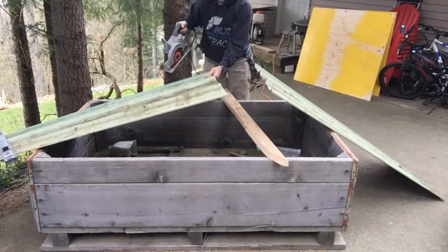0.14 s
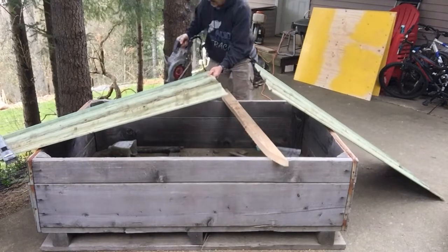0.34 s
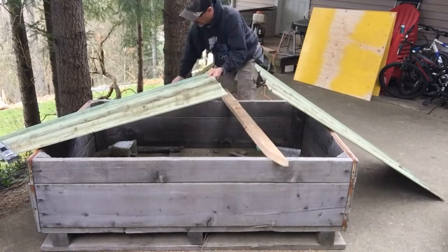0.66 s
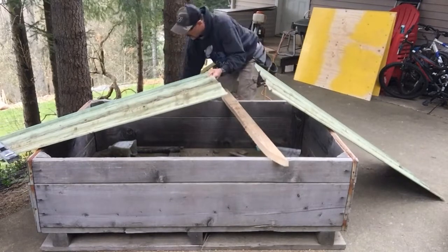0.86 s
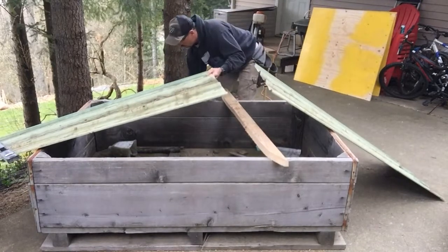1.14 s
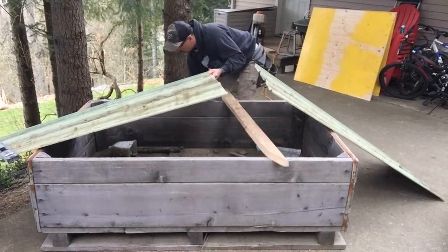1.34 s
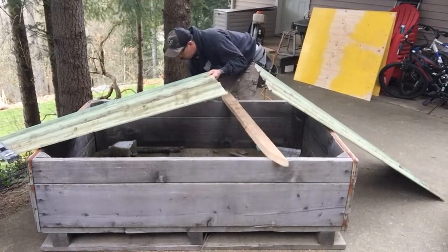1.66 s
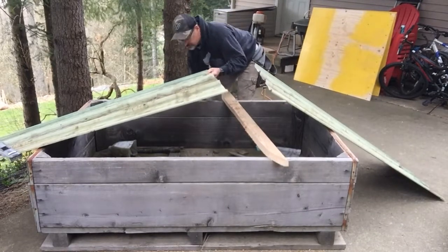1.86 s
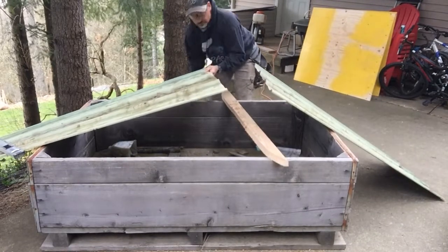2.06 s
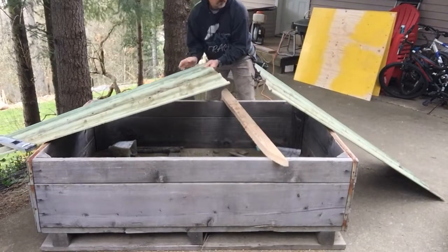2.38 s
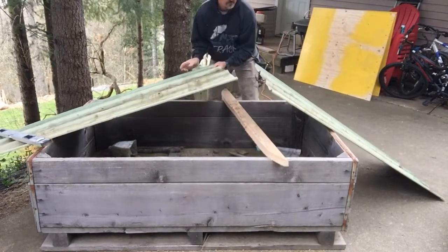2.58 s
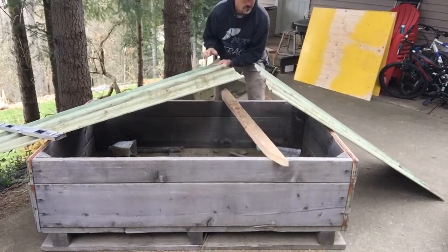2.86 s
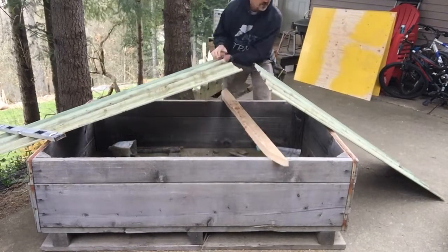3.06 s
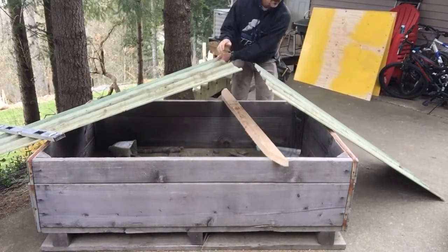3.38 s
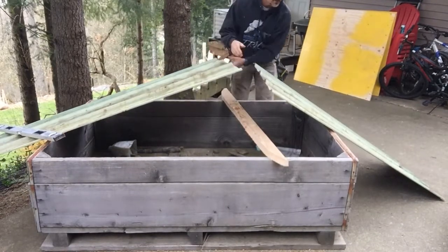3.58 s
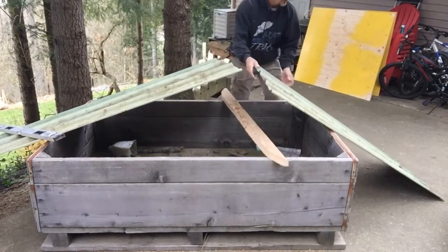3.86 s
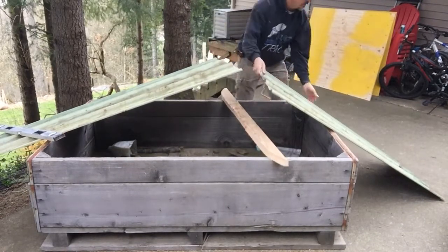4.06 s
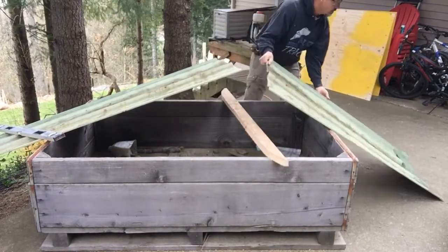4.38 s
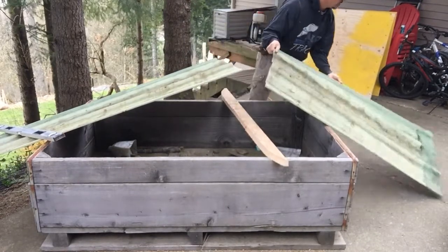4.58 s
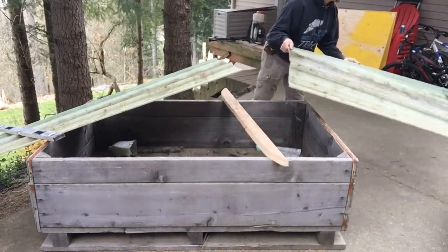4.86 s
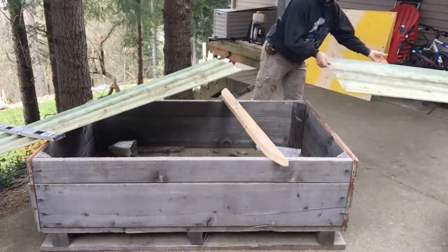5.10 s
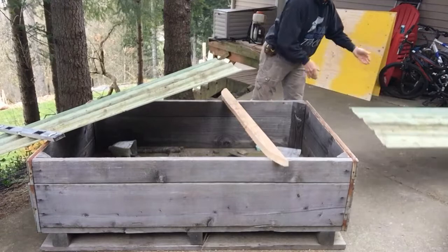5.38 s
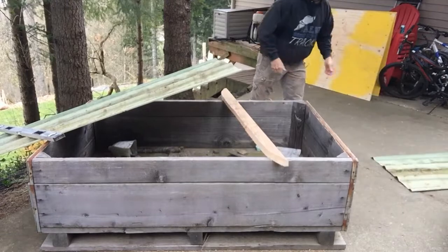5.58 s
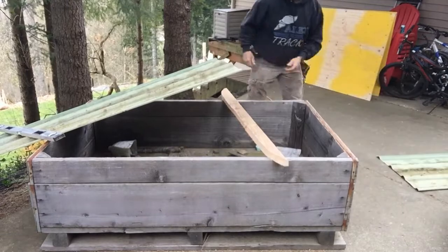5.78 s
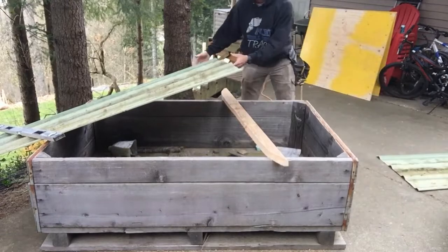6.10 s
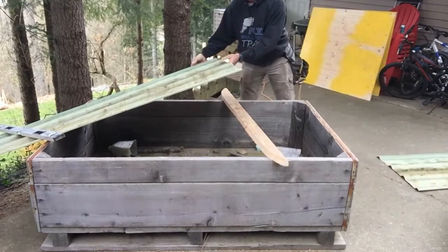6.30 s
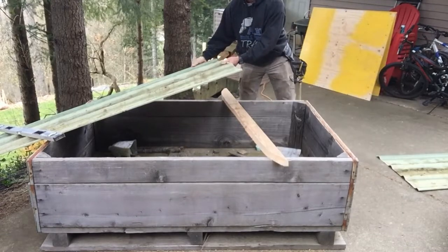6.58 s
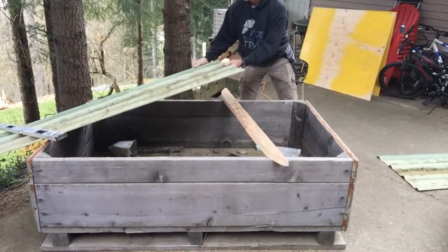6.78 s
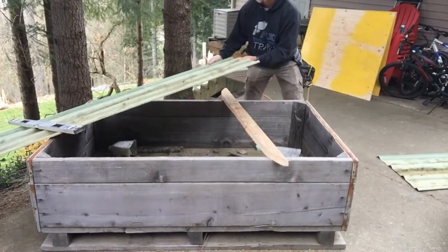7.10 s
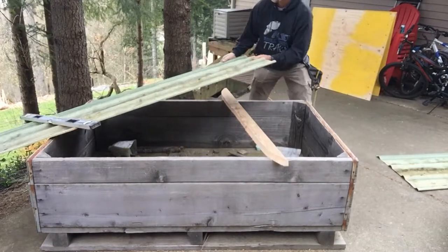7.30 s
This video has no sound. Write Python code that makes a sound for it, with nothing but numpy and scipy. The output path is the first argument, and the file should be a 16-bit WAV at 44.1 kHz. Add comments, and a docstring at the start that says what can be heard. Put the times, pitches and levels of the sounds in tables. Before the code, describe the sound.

A corrugated metal sheet shudders at the very start and rings out over about a second. From 1.2 to 2.1 seconds a stopped saw is set down with several rattling knocks and dull, hollow thumps. Between 2.2 and 3.3 seconds the sheet is dragged over a timber crate, scraping and catching with short dry cracks. Lighter scrapes and clicks come from 4.2 to 4.7 seconds as an offcut is lifted. At about 5.6 seconds it lands on concrete with a bright, clattering crash, by far the loudest sound, briefly overloading the microphone and ringing away within a second. From 6.8 seconds to the end the sheet slides again with a softer scrape. The setting is outdoors, with a slight echo. A low breeze rumbles on the microphone throughout, and small birds give thin, high whistles and faint chirps, clearest around 2 and 4 seconds.

```python
"""Handling a corrugated metal sheet

The sheet rings out after a cut, and the stopped saw is set down with a few rattling knocks. Dragged over a
timber crate, the sheet's edge slips and catches, exciting its bending modes. The offcut is lifted and tossed
onto concrete with a crash so loud its peaks are flattened; then the sheet is slid forward again. Small birds
whistle in the trees and a breeze rumbles."""
import sys
import numpy as np
from scipy import signal
from scipy.io import wavfile
from scipy.ndimage import uniform_filter1d

SR = 44100
rng = np.random.default_rng(int(sys.argv[2]) if len(sys.argv) > 2 else 0)


def wav_record(signal):
    """Record a signal, one row per channel, as 16-bit PCM in the file named by sys.argv[1]."""
    frames = np.transpose(np.atleast_2d(signal))
    bounded = np.clip(frames, -1, 1)
    # unit amplitude maps onto the largest positive 16-bit level
    quanta = np.round(bounded * 32767).astype(np.int16)
    wavfile.write(sys.argv[1], SR, quanta)


N = 328545


def amp(db):
    """Decibels to gain."""
    return 10 ** (np.asarray(db) / 20)


def unit_rms(x):
    """Scales to rms 1."""
    return x / np.sqrt(np.mean(x ** 2) + 1e-20)


def curve_at(points, hz):
    """Interpolates (Hz, value) rows on a log-frequency axis."""
    points_hz, values = np.transpose(points)
    return np.interp(np.log(hz + 1), np.log(points_hz + 1), values)


def add(mix, start_s, sound):
    """Mixes a sound in at start_s."""
    part = mix[max(round(start_s * SR), 0):][:len(sound)]
    part += sound[:len(part)]


def colour(x, db_at, size=4096):
    """Minimum-phase filter of unit energy, shaped by db_at(Hz)."""
    db = db_at(abs(np.fft.fftfreq(size, 1 / SR)))
    log_gain = np.log(amp(np.maximum(db - db.max(), -90)))
    taps = np.fft.ifft(np.exp(np.conj(signal.hilbert(log_gain)))).real
    return signal.oaconvolve(x, taps / np.linalg.norm(taps))[:len(x)]


def hump_db(hz, centre_hz, db_per_octave):
    """Broad spectral hump: the harder a contact, the higher its centre."""
    return -db_per_octave * np.hypot(np.log2((hz + 20) / centre_hz), .5)


def impacts(samples, per_s, spread_db):
    """Tiny random impacts of uneven size, rms 1."""
    size = amp(spread_db * np.minimum(rng.exponential(1, samples), 4))
    sign = rng.choice([-1, 1], samples)
    struck = rng.random(samples) < per_s / SR
    return unit_rms(size * sign * struck + 1e-9)


def yard_echo(x, t60_s):
    """Scattered reflections from house wall, ground and trunks."""
    t = np.arange(SR) / SR
    taps = impacts(SR, 2500, 1.5) * amp(-60 * t / t60_s) * (t > .006)
    return signal.oaconvolve(x, taps / np.linalg.norm(taps))[:N]


def scrape(pushes, spectrum, slips_per_s, spread_db, judder_db):
    """Each push rises, holds and lets go; the edge slips in clumps, and a sharper bite adds treble."""
    t = np.arange(N) / SR
    body, treble = np.zeros((2, N))
    for start_s, rise_s, hold_s, release_s, force_db, bite_db in pushes:
        rise = np.clip((t - start_s) / rise_s, 0, 1)
        release = np.clip((t - start_s - rise_s - hold_s) / release_s, 0, 2)
        effort = rise * amp(force_db - 60 * release)
        body = np.hypot(body, effort)
        treble = np.hypot(treble, amp(bite_db) * effort)
    judder = unit_rms(uniform_filter1d(rng.standard_normal(N), size=350))
    force = impacts(N, slips_per_s, spread_db) * amp(judder_db * judder)
    dull = signal.sosfiltfilt(signal.butter(1, 2200, fs=SR, output="sos"), force)
    return colour(body * dull + treble * (force - dull), lambda hz: curve_at(spectrum, hz))


# Strongest bending modes. Each row: frequency in Hz, level in dB.
SHEET_MODES = [(371.4, -41), (646.0, -47), (759.0, -49.5), (834.4, -45), (904.4, -41.5), (1007, -51.5),
               (1114, -57.5), (1281, -43.5), (1497, -48), (1620, -49.5), (1723, -47), (1949, -55.5),
               (2003, -41.5), (2046, -50.5)]
# Bands the ribs let ring longer. Each row: centre in Hz, half-width in Hz.
RIB_RINGS = [(700, 65), (1950, 130), (3200, 200), (3900, 130)]
# Bands the ribs favour or choke. Each row: frequency in Hz, gain in dB.
RIB_GAINS = [(250, -2), (400, 0.5), (490, -2), (600, 1), (2060, 3), (2230, 0.5), (2950, 1), (3300, 3.5),
             (3700, 1), (4000, 0.5), (4400, 1), (6300, -1), (8000, -2.5)]


def sheet(force, t60s_s, contact_db, modes_db, rib_stretch=0.044, wander_hz=3.7):
    """Contact noise plus a dense cloud of bending modes; t60s_s runs from bass to treble."""
    t = np.arange(2 * SR) / SR
    modes = unit_rms(sum(amp(db) * np.sin(2 * np.pi * (hz * t + rng.random()))
                         for hz, db in SHEET_MODES))
    t60_curve = list(zip((400, 1200, 3300, 9000), t60s_s))
    out = amp(contact_db) * force
    for mode_set in range(3):
        cloud = rng.standard_normal(len(t)) + amp(modes_db) * modes
        bin_hz, frame_s, frames = signal.stft(cloud, SR, nperseg=256)
        ribs = sum(np.exp(-((bin_hz - hz) / half_hz) ** 2) for hz, half_hz in RIB_RINGS)
        t60_s = (curve_at(t60_curve, bin_hz) * (1 + rib_stretch * ribs))[:, None]
        ring = signal.istft(frames * amp(-60 * frame_s / t60_s) / np.sqrt(t60_s), SR, nperseg=256)[1]
        ring = colour(ring, lambda hz: curve_at(RIB_GAINS, hz))
        # The contact point wanders, so the force reaches changing sets of modes.
        share = np.cos(2 * np.pi * (wander_hz * np.arange(N) / SR + mode_set / 3)) * np.sqrt(2 / 3)
        out = out + signal.oaconvolve(share * force, ring / np.linalg.norm(ring))[:N]
    return out / np.hypot(1, amp(contact_db))


# Pushes of the edge over timber. Each row: start, rise, hold and release t60 in seconds,
# force in dB, treble bite in dB.
SHAKE_PUSHES = [(0, 0.00067, 0.0087, 0.14, -12.5, -1.5), (.01, .01, 0.09, 0.13, -20.5, -18),
                (.203, 0.0065, 0.01, 0.48, -32, 4.5)]
DRAG_PUSHES = [(2.17, 0.13, 0.1, .2, -44, -2), (2.33, 0.041, 0.15, 0.28, -45, 13),
               (2.4, .19, 0.076, 0.39, -30.5, 1.5), (2.72, 0.047, .015, 0.15, -25.5, -3),
               (2.84, .02, 0.011, 0.25, -27.5, -0.5), (2.95, 0.017, 0.087, .2, -30, 5.5),
               (3.05, 0.03, .04, 0.22, -35.5, 17.5), (3.11, .03, .02, 0.35, -33.5, -14)]
LIFT_PUSHES = [(4.225, 0.0077, .11, .25, -44, 4.5), (4.425, 0.0038, 0.12, .2, -40, 5),
               (4.52, 0.066, .025, .2, -28, -1), (4.95, 0.04, 0.16, .2, -57, 2),
               (5.162, .009, .03, .35, -41.5, -12.5), (5.28, 0.036, 0.19, .1, -54, -25)]
SLIDE_PUSHES = [(6.77, 0.085, .3, .3, -40.5, -2), (7.16, .15, .15, .2, -39.5, 7),
                (7.4, 0.038, .02, .2, -31, -5.5)]
# What the sheet radiates in each position. Each row: frequency in Hz, relative density in dB.
SHAKE_SPECTRUM = [(53, 2), (90, -0.5), (130, -7.5), (365, -2), (406, -8.5), (727, -5), (982, -10.5),
                  (1360, -9), (1580, -12), (1910, -12), (2950, -19), (14500, -29), (15500, -33)]
DRAG_SPECTRUM = [(82, -52), (140, -3), (238, -5), (333, 2), (367, -9), (405, -0.5), (513, -12.5),
                 (776, -12.5), (1370, -17.5), (1960, -20), (3330, -29.5), (6380, -28.5), (7610, -36),
                 (13700, -37), (15500, -44)]
LIFT_SPECTRUM = [(120, -52), (200, -16.5), (288, -11.5), (358, 0.5), (407, -7.5), (607, -5), (1110, -10.5),
                 (2020, -9.5), (2700, -17), (3230, -15), (4410, -19.5), (12700, -20), (15500, -19)]
SLIDE_SPECTRUM = [(88, -32.5), (150, -12), (307, 2), (499, -7.5), (540, -6), (708, -7.5), (1290, -8),
                  (1420, -11.5), (1730, -10), (3340, -18), (5980, -15), (9900, -22), (15500, -16.5)]


def sheet_handling():
    """The sheet shakes, is dragged, lifted and slid; hands and timber damp its treble."""
    shake = scrape(SHAKE_PUSHES, SHAKE_SPECTRUM, slips_per_s=6000, spread_db=2.1, judder_db=2.5)
    out = sheet(shake, t60s_s=(1.73, 1.26, 1.11, 1.0), contact_db=-2, modes_db=-18)
    drag = scrape(DRAG_PUSHES, DRAG_SPECTRUM, slips_per_s=2000, spread_db=1.73, judder_db=1.5)
    out += sheet(drag, t60s_s=(1.66, 0.72, 0.63, 0.082), contact_db=-0.5, modes_db=-24)
    lift = scrape(LIFT_PUSHES, LIFT_SPECTRUM, slips_per_s=5700, spread_db=2.9, judder_db=1.5)
    out += sheet(lift, t60s_s=(1.6, 0.78, 0.48, 0.085), contact_db=1, modes_db=-21.5, rib_stretch=.6)
    slide = scrape(SLIDE_PUSHES, SLIDE_SPECTRUM, slips_per_s=7000, spread_db=2.5, judder_db=1.15)
    return out + sheet(slide, t60s_s=(0.85, 1, 0.94, 0.31), contact_db=3, modes_db=-28)


# Turbulence at the microphone. Each row: frequency in Hz, relative density in dB.
BUFFET_SPECTRUM = [(20, -53), (35, -15), (55, 2), (95, -6), (150, -9), (260, -20.5), (500, -34),
                   (1200, -59.5)]


def buffet(pitch_ratio):
    """Turbulence of even strength; faster air shifts it upward."""
    noise = colour(rng.standard_normal(N), lambda hz: curve_at(BUFFET_SPECTRUM, hz / pitch_ratio))
    return noise / np.sqrt(uniform_filter1d(noise ** 2, size=2500) + 1e-6)


# Steady outdoor air. Each row: frequency in Hz, relative density in dB.
AIR_SPECTRUM = [(40, -15), (100, -4), (330, 2), (410, -7.5), (500, -17), (1300, -12.5), (2200, -17.5),
                (4000, -23), (6300, -26.5), (8500, -26.5), (15500, -31.5)]
# Gusts, and wafts from the flexing sheet. Each row: middle and half-length in seconds, level in dB.
GUSTS = [(.11, 0.17, -31), (1.014, 0.047, -40.5), (1.554, 0.061, -49), (1.856, 0.36, -39.5),
         (2.98, 0.3, -40.5), (3.896, 0.019, -42.5), (4.032, 0.029, -42.5), (4.347, .035, -40.5),
         (4.897, 0.024, -41), (5.642, .06, -28), (5.86, 0.026, -35), (6.063, 0.03, -38),
         (6.279, 0.027, -43.5), (6.495, .03, -44)]


def wind():
    """Faint air, a lumpy low breeze that drops once, and higher-pitched gusts on the microphone."""
    t = np.arange(N) / SR

    def bell(middle_s, half_s):
        return np.exp(-np.minimum(((t - middle_s) / half_s) ** 2, 20))

    air = colour(rng.standard_normal(N), lambda hz: curve_at(AIR_SPECTRUM, hz))
    swell = unit_rms(sum(np.sin(2 * np.pi * (hz * t + rng.random())) for hz in np.geomspace(4, 10, 12)))
    breeze_db = -51.5 + 5 * np.tanh(swell) - 20 * bell(middle_s=5.13, half_s=0.11)
    gusts = sum(amp(db) * bell(middle_s, half_s) for middle_s, half_s, db in GUSTS)
    return amp(-60) * air + amp(breeze_db) * buffet(pitch_ratio=0.94) + gusts * buffet(pitch_ratio=1.1)


# The edge snapping free. Each row: start in seconds, level in dB, t60 in seconds, hump centre in Hz.
CATCHES = [(.216, -34.5, 0.23, 9050), (2.569, -35.5, 0.064, 2480), (2.642, -29, 0.093, 2340),
           (2.762, -35, .07, 1800), (2.856, -36, .095, 1800), (2.939, -38, 0.14, 4000),
           (2.969, -24, 0.041, 1830), (3.094, -27.5, .09, 2900), (3.336, -56.5, 0.22, 3480),
           (3.557, -60, .16, 2230), (3.622, -46, 0.057, 2770), (4.231, -38, .036, 3610),
           (4.432, -38.5, 0.044, 4530), (4.579, -31, .046, 5030), (6.449, -61.5, .33, 4020),
           (6.825, -45.5, 0.03, 4530), (6.847, -36.5, .076, 5550)]


def edge_catches():
    """Short dry cracks where the edge jumps over the timber."""
    out, t = np.zeros(N), np.arange(SR // 2) / SR
    for start_s, db, t60_s, centre_hz in CATCHES:
        crack = impacts(len(t), 6000, 1.6) * amp(-60 * t / t60_s)
        add(out, start_s, amp(db) * colour(crack, lambda hz: hump_db(hz, centre_hz, 11.7)))
    return out + amp(-7.5) * yard_echo(out, t60_s=.5)


def bird_note(hz):
    """Soft-edged pure tone on a pitch curve."""
    return signal.windows.tukey(len(hz), .4) * np.sin(2 * np.pi * np.cumsum(hz) / SR)


# Bird whistles. Each row: start and length in seconds, pitch in Hz, level in dB.
WHISTLES = [(1.968, .2, 8080, -43.5), (3.95, .22, 8200, -49), (4.193, 0.16, 8060, -49.5),
            (4.865, 0.02, 8130, -61), (5.122, 0.026, 8500, -65)]
# Bird chirps. Each row: start in seconds, level in dB.
CHIRPS = [(.862, -67), (1.118, -67), (1.27, -62), (1.3, -65), (3.31, -74), (6.68, -65), (6.74, -61)]


def birds():
    """Thin sagging whistles and chirps that dip and climb again, scattered by the trees."""
    sag_hz_per_s, warble_depth_hz, warbles_per_s = 550, 110, 35
    chirp_s, chirp_hz, dip_hz = 0.066, 8530, 950
    out = np.zeros(N)
    for start_s, length_s, hz, db in WHISTLES:
        t = np.arange(int(length_s * SR)) / SR
        drift = 0.82 * np.sin(2 * np.pi * (7 * t + rng.random()))
        warble = np.sin(2 * np.pi * warbles_per_s * t + drift)
        add(out, start_s, amp(db) * bird_note(hz - sag_hz_per_s * t + warble_depth_hz * warble))
    dip = np.sin(np.linspace(0, np.pi, int(chirp_s * SR)))
    for start_s, db in CHIRPS:
        depth_hz = dip_hz * (1 + 0.104 * rng.standard_normal())
        add(out, start_s, amp(db) * bird_note(chirp_hz - depth_hz * dip))
    return out + amp(-6.5) * yard_echo(out, t60_s=.35)


# Resonances of the saw's housing, shoe and guard. Each row: centre and width in Hz, level in dB.
SAW_MODES = [(613, 140, 8), (850, 130, 8), (1080, 96, 6), (1147, 56, 9.5), (1330, 50, -9), (1546, 71, 8.5),
             (1695, 35, 8), (1780, 64, -6), (2410, 44, 4.5), (2660, 57, 2), (2927, 78, 5.5), (3360, 48, 3),
             (3760, 90, -3), (3960, 170, 4), (4550, 120, 4), (5540, 100, 10), (6400, 71, 8),
             (6840, 100, -4)]


def saw_body_db(hz):
    """Gain of the saw's resonances; their pitch and mix change with the point of contact."""
    peaks = 0
    for mode_hz, width_hz, db in SAW_MODES:
        gain = amp(db + 2 * rng.standard_normal())
        peak_hz = mode_hz * (1 + 0.0505 * rng.standard_normal())
        peaks += gain / (1 + (2 * (hz - peak_hz) / width_hz) ** 2)
    return 20 * np.log10(1 + peaks)


# The saw set down. Each row: start in seconds, level in dB, rattle t60 in seconds, clink pitch in Hz.
SAW_KNOCKS = [(1.183, -37.5, 0.2, 2030), (1.363, -42.5, .17, 3730), (1.474, -29.5, 0.2, 2640),
              (1.482, -36, 0.17, 1680), (1.568, -28.5, .045, 1160), (1.62, -43, .1, 1340),
              (1.673, -37, 0.058, 1120), (1.708, -37.5, 0.13, 1740), (1.7931, -21, .16, 1870),
              (1.866, -29, 0.1, 1860), (1.977, -34, 0.099, 1580), (2.043, -38, 0.24, 1230),
              (2.112, -44, 0.18, 1690)]


def saw_knocks():
    """A blow and loose parts ring the saw; the struck part clinks; the echo shifts as the saw moves."""
    out, t = np.zeros(N), np.arange(SR // 2) / SR
    attack = 1 - np.exp(-t / 0.003)
    for start_s, db, t60_s, clink_hz in SAW_KNOCKS:
        def response_db(hz):
            clink_db = 8 / (1 + ((hz - clink_hz) / 130) ** 2)
            return saw_body_db(hz) + hump_db(hz, clink_hz, 6) + clink_db

        blow = impacts(len(t), 5000, 4.8) * np.exp(-t / 0.003)
        rattle = 0.77 * impacts(len(t), 2000, 2.4) * amp(-60 * t / t60_s)
        knock = amp(db) * colour((blow + rattle) * attack, response_db)
        add(out, start_s, knock)
        add(out, start_s, amp(-6) * yard_echo(knock, t60_s=0.57))
    return out


# Dull blows on timber and concrete. Each row: start in seconds, level in dB, pitch in Hz,
# swell time constant in seconds.
THUMPS = [(1.186, -37, 293, 0.0021), (1.468, -17, 292, 0.0021), (1.793, -15.5, 312, 0.0013),
          (1.857, -21, 353, 0.0028), (2.039, -28, 320, 0.0018), (2.749, -24.5, 298, .007),
          (5.568, -25, 182, 0.0029)]


def thumps():
    """A weight meets a firm surface: a few damped low cycles and a hollow clack of the boards."""
    out, t = np.zeros(N), np.arange(SR // 4) / SR
    for start_s, db, pitch_hz, swell_s in THUMPS:
        push = (t / swell_s) ** 2 * np.exp(2 - t / swell_s) / 4
        tones = np.sin(2 * np.pi * pitch_hz * t) + 0.7 * np.sin(2 * np.pi * 165 * t)
        clack = colour(impacts(len(t), 3000, 2.7), lambda hz: hump_db(hz, 680, 24)) * np.exp(-t / 0.01)
        add(out, start_s, amp(db) * (push * tones + amp(-20) * clack))
    return out + amp(-9) * yard_echo(out, t60_s=.45)


# The offcut flexes once, lands edge first, then slaps flat. Each row: start in seconds,
# level in dB, chatter time constant in seconds, hump centre in Hz.
CRASH_HITS = [(5.159, -42, 0.052, 1700), (5.558, -25.5, 0.033, 2586), (5.567, -9, 0.082, 2487),
              (5.5804, 2, 0.0067, 2700), (5.590, -12.5, 0.088, 485), (5.623, 5.5, 0.017, 1013),
              (5.633, -3.5, 0.041, 6900), (5.651, 1, 0.0063, 800), (5.675, -1.5, 0.0041, 900),
              (5.705, -6.5, 0.011, 1405)]
# What the offcut radiates. Each row: frequency in Hz, relative density in dB.
CRASH_SPECTRUM = [(29, -44.5), (50, -23), (119, -5.5), (183, -24.5), (325, 2), (488, -10.5), (564, -4),
                  (869, -0.5), (1050, -7.5), (1130, -1.5), (2810, -10), (5380, -15), (6210, -11.5),
                  (7530, -17.5), (15500, -19)]


def offcut_crash():
    """Rib after rib chatters on the concrete and sets the free offcut ringing."""
    force, t = np.zeros(N), np.arange(SR // 2) / SR
    attack = 1 - np.exp(-t / 0.0018)
    for start_s, db, decay_s, centre_hz in CRASH_HITS:
        chatter = impacts(len(t), 7000, 2.12) * np.exp(-t / decay_s) * attack
        hit = colour(chatter, lambda hz: curve_at(CRASH_SPECTRUM, hz) + hump_db(hz, centre_hz, 5.1))
        add(force, start_s, amp(db) * hit)
    return sheet(force, t60s_s=(1.245, 1.115, 0.94, 0.58), contact_db=5, modes_db=-31,
                 rib_stretch=.05, wander_hz=41)


def scene():
    """All sources at one microphone."""
    metal = sheet_handling() + edge_catches() + offcut_crash()
    return (metal + saw_knocks() + thumps() + birds() + wind())[None]


def record(dry):
    """The microphone sheds deep bass, the loudest peaks are flattened, and a low-pass cuts the top."""
    low_cut_hz, high_cut_hz = 42, 15850
    heard = signal.sosfilt(signal.butter(3, low_cut_hz, "highpass", fs=SR, output="sos"), dry)
    clipped = heard / (1 + heard ** 12) ** (1 / 12)
    lowpass = signal.firwin(511, high_cut_hz, window=("kaiser", 8), fs=SR)
    return signal.oaconvolve(clipped, lowpass[None], "same")


dry = scene()
out = record(dry)
wav_record(out)
```